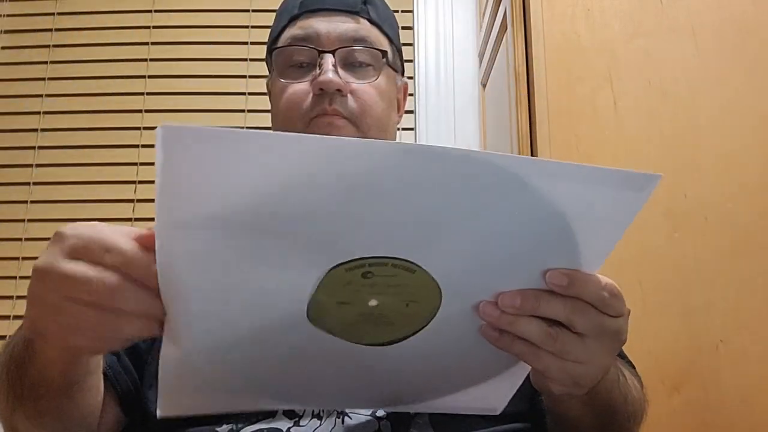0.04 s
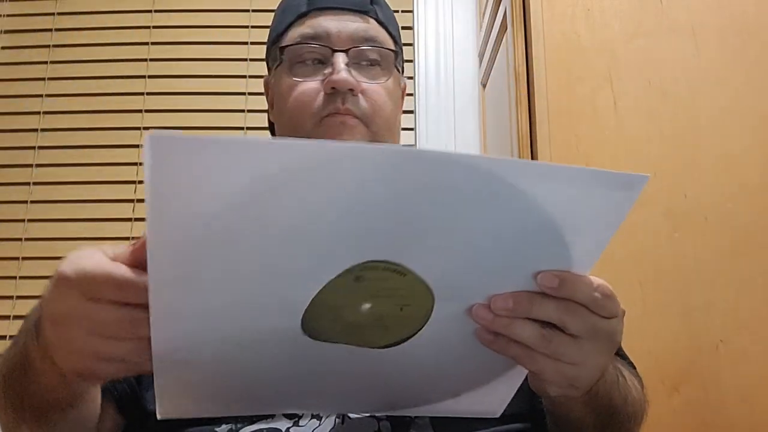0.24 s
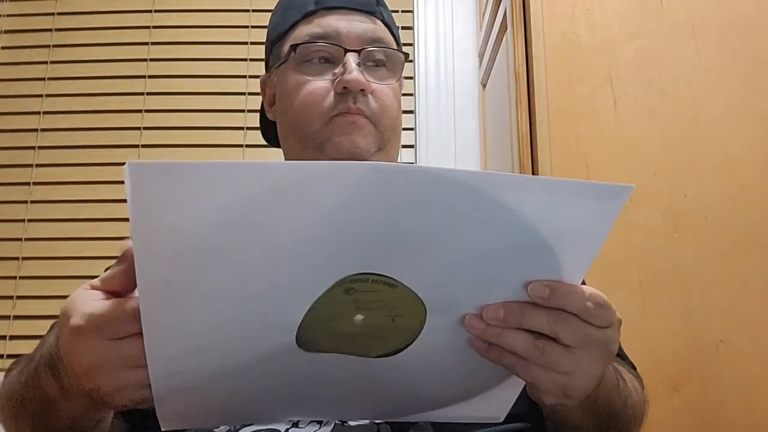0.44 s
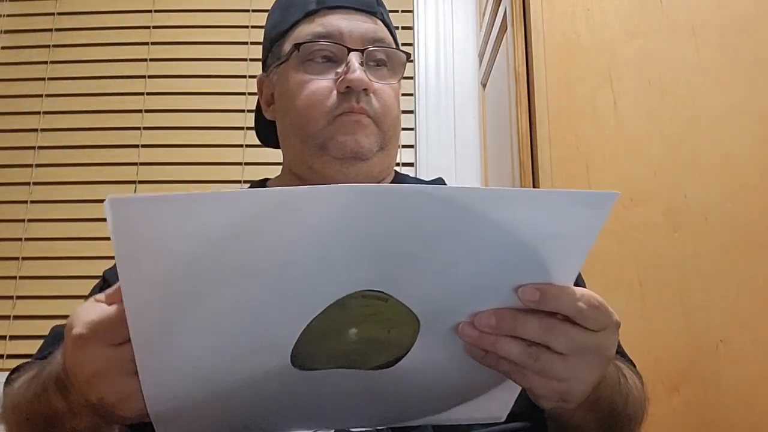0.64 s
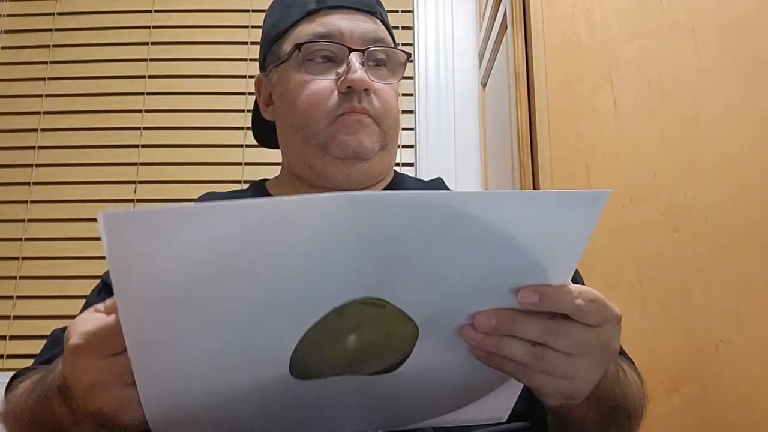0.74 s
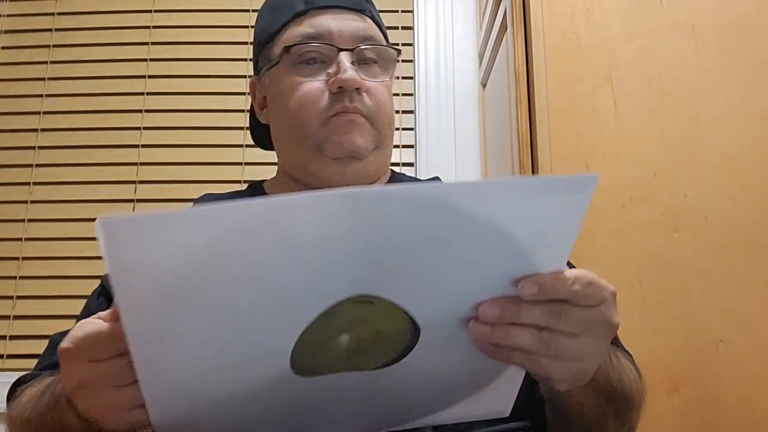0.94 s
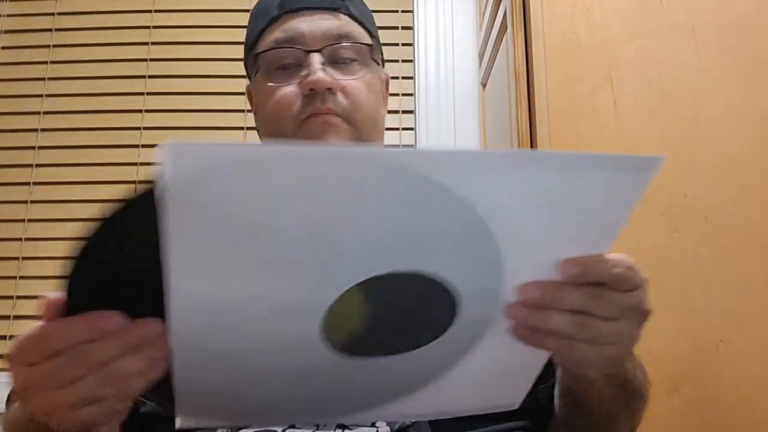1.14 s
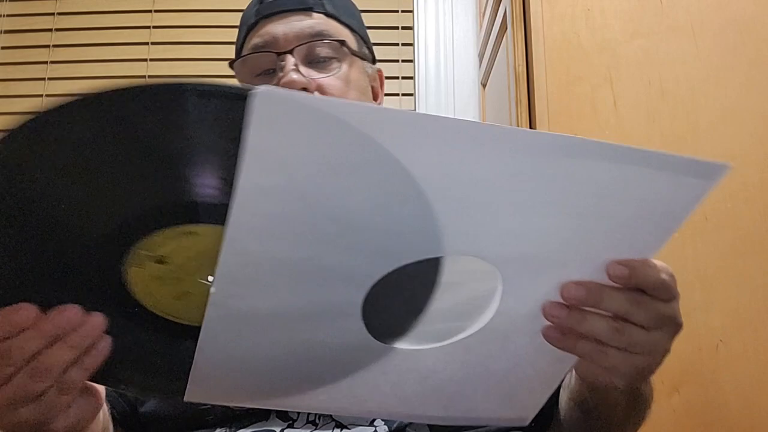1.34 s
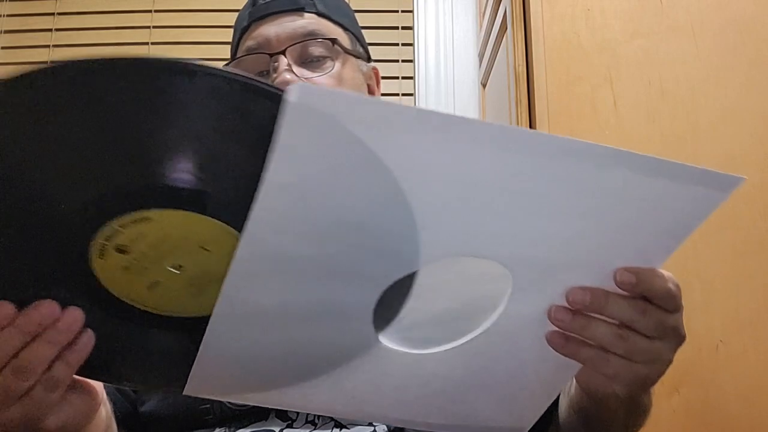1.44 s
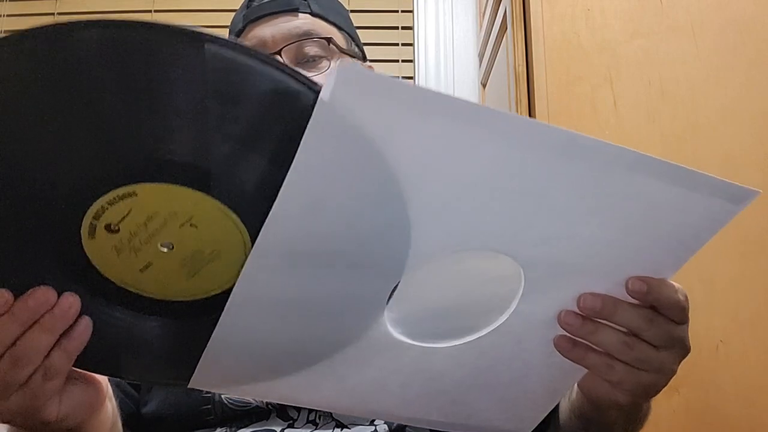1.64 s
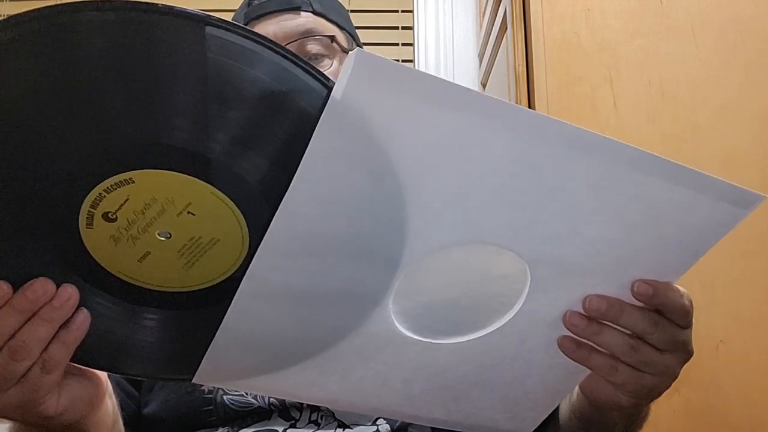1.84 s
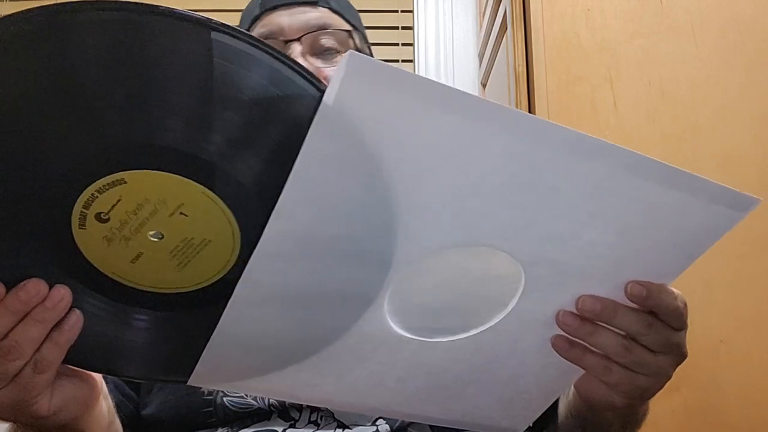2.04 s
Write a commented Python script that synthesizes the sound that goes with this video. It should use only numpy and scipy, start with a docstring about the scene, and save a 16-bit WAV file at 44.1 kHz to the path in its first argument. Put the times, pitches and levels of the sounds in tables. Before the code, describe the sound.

Paper crinkles and pops as a vinyl record is drawn hissing from its sleeve.

```python
"""A record leaves its paper sleeve

A small room with a low rumble; a vinyl record is handled close to a camera's stereo microphone.
Fingers rustle the inner sleeve open: creases tick, the paper buckles with one loud snap and flaps back.
The disc bumps free and slides out with a hiss that fades as less of it touches the paper."""
import sys
import numpy as np
from scipy import signal
from scipy.fft import rfft, irfft, next_fast_len
from scipy.io import wavfile
from scipy.ndimage import map_coordinates

SR = 44100
rng = np.random.default_rng(int(sys.argv[2]) if len(sys.argv) > 2 else 0)


def unload_wav(signal):
    """Save mono or channel-first audio to the path in sys.argv[1] as 16-bit WAV at rate SR, clipped to [-1, 1]."""
    wavfile.write(
        sys.argv[1],
        SR,
        np.round(np.clip(np.atleast_2d(signal).T, -1, 1) * 32767).astype(np.int16),
    )


N = 92610
TIME = np.arange(N) / SR
FFT_SIZE = 2 * next_fast_len(N * 5 // 8)
HZ = np.fft.rfftfreq(FFT_SIZE, 1 / SR)


def amp(db):
    """Decibels to gain."""
    return 10 ** (np.asarray(db) / 20)


def unit(x):
    """x at rms 1."""
    return x / np.sqrt(np.mean(x ** 2) + 1e-20)


def curve(points, hz=HZ):
    """(Hz, value) points read on a log frequency axis."""
    freqs, values = np.transpose(points)
    return np.interp(np.log(hz + 1), np.log(freqs + 1), values)


def envelopes(rows):
    """A gain per sample for each dB column, fading to silence outside the table."""
    times, *columns = np.transpose(rows)
    fade = np.interp(TIME, [times[0] - .03, times[0], times[-1], times[-1] + .03], [0, 1, 1, 0])
    return [fade * amp(np.interp(TIME, times, db)) for db in columns]


def swell(peak_s, sigma_s):
    """A bell-shaped envelope."""
    return np.exp(-.5 * ((TIME - peak_s) / sigma_s) ** 2)


def wobble(knots_per_s):
    """A smooth random curve."""
    return map_coordinates(rng.standard_normal(1024), [TIME * knots_per_s], mode="wrap")


def causal(colour):
    """The minimum-phase response of (Hz, dB) points."""
    cepstrum = irfft(curve(colour) * np.log(10) / 20)
    return np.exp(rfft(np.r_[cepstrum[0], 2 * cepstrum[1:FFT_SIZE // 2]], FFT_SIZE))


# How alike the microphone's two sides are. Each row: frequency in Hz, correlation.
MIC_LIKENESS = [(60, 0.49), (160, 0.95), (320, 0.97), (640, 0.76), (1400, 0.25), (2500, 0.45),
                (4000, -0.098), (6500, -0.1), (15000, 0)]
# The lean to the left. Each row: frequency in Hz, left minus right in dB.
MIC_BALANCE = [(60, 5.5), (130, 3.5), (300, 2), (1000, 1.5), (2500, 4.5), (6000, -.3), (15000, 0.1)]

def at_mic(pair, response):
    """Mid and side excitations through a response of unit power, spread over left and right."""
    angle = np.arccos(curve(MIC_LIKENESS)) / 2
    spectra = rfft(pair, FFT_SIZE) * response / np.sqrt(np.mean(abs(response) ** 2))
    mid, side = spectra * [np.cos(angle), np.sin(angle)]
    lean = amp(curve(MIC_BALANCE) / 2)
    return irfft(np.array([(mid + side) * lean, (mid - side) / lean]))[:, :N]


def noise(colour):
    """Smooth stereo noise at rms 1."""
    return unit(at_mic(rng.standard_normal((2, N)), amp(curve(colour))))


def friction(colour, grain_db, grains_per_s=1400, grain_share=.33):
    """Countless paper fibres slipping, some of them catching harder, at rms 1."""
    catches = rng.random(N) < grains_per_s / SR
    sizes = catches * amp(grain_db * np.minimum(rng.exponential(size=N), 2.3))
    grains = unit(signal.lfilter(np.hanning(12), 1, sizes) * rng.standard_normal((2, N)))
    slips = np.sqrt(grain_share) * grains + np.sqrt(1 - grain_share) * rng.standard_normal((2, N))
    return unit(at_mic(slips, causal(colour)))


def patchy(x, depth_db, patch_hz=202.8, patch_s=.025):
    """The bending sheet favours ever-changing narrow bands."""
    hz, t, spectra = signal.stft(x, SR, nperseg=512)
    where = np.meshgrid(hz / patch_hz, t / patch_s, indexing="ij")
    patches = map_coordinates(rng.standard_normal((256, 256)), where, mode="wrap")
    return unit(signal.istft(spectra * amp(depth_db * patches), SR, nperseg=512)[1][:, :N])


def burst(start, t60, attack_s=.0003, side_lag_s=.0003, click_share=.31):
    """A click, then a run of smaller slips that dies away, as mid and side excitations."""
    age = np.maximum(TIME - start, 0)
    decay = np.exp(-np.minimum(np.log(1000) * age / t60, 100))
    run = np.sign(rng.standard_normal((2, N))) * (1 - np.exp(-age / attack_s)) * decay
    click = np.sinc((TIME - start - attack_s - np.array([[0], [side_lag_s]])) * SR)
    return np.sqrt(1 - click_share) * run + np.sqrt(click_share) * np.linalg.norm(run[0]) * click


def centred(pair, side_db=-3):
    """Weakens the side excitation, so left and right sound more alike."""
    return pair * amp([[0], [side_db]])


# Room tone at the microphone. Each row: frequency in Hz, relative level in dB.
RUMBLE_COLOUR = [(25, -10), (45, -11.5), (67, 2), (100, -11.5), (170, -7.5), (300, -1), (450, -13),
                 (700, -20.5), (1200, -34.5), (2500, -40), (8000, -41.5), (16000, -44.5)]

def rumble():
    """The room's steady low background."""
    return amp(-58.5) * noise(RUMBLE_COLOUR)


# Fingers on the sleeve, close up. Each row: time in seconds, relative level in dB.
RUSTLE_LEVELS = [(0.0, -73.5), (0.052, -68), (0.06, -51.5), (0.114, -60), (0.154, -59.5), (0.16, -46),
                 (0.168, -34.5), (0.192, -42.5), (0.246, -46), (0.314, -63), (0.398, -51), (0.478, -53),
                 (0.522, -62.5), (0.592, -68.5), (0.614, -54.5), (0.766, -50.5), (0.82, -60.5),
                 (0.874, -49.5), (0.958, -62.5), (1.0, -61)]
# Their rub. Each row: frequency in Hz, relative level in dB.
RUSTLE_COLOUR = [(40, -26), (130, -8), (300, 1.5), (550, 0), (1200, -5.5), (1800, 1.5), (2400, -2),
                 (2900, -5), (3600, -4), (5000, -6), (8000, -6), (10000, -14.5), (13500, -13), (16000, -14)]

def rustle():
    """Fingers rub the paper as they work their way into the sleeve."""
    level, = envelopes(RUSTLE_LEVELS)
    return level * amp(5 + .8 * wobble(76)) * patchy(friction(RUSTLE_COLOUR, grain_db=1), depth_db=3)


# Creases popping near the microphone; the last row is the bright crack of the disc's knock at 1.15 s. # Each
# row: start in seconds, relative levels of ring and crack in dB, seconds to fall 60 dB.
CREASE_POPS = [(0.0624, -26.5, -30, 0.0047), (0.0732, -50, -33, 0.0071), (0.0798, -50, -28, .005),
               (.084, -36, -42, 0.0088), (0.12, -34.5, -60, 0.031), (0.1635, -18, -21.5, 0.035),
               (0.1661, -9.5, -22, 0.019), (.1692, -12.5, -27, 0.038), (.1762, -12, -31, .02),
               (.2285, -30.5, -34.5, 0.036), (0.336, -40.5, -54, 0.016), (0.3923, -30, -38, 0.019),
               (.409, -35.5, -48, 0.035), (0.419, -38.5, -47, 0.029), (0.442, -33, -51, 0.0093),
               (0.45, -33.5, -58, 0.0086), (0.4558, -44, -31, 0.0066), (0.4742, -39, -33, 0.0096),
               (.612, -39, -52, .04), (.643, -51, -43, .006), (.733, -42.5, -43.5, 0.039),
               (.769, -28, -50, .009), (.866, -41.5, -44, 0.022), (.875, -47, -33.5, .02),
               (1.1527, -26, -15, 0.0037)]
# The sleeve's resonances. Each row: frequency in Hz, width in Hz, relative level in dB.
SLEEVE_MODES = [(421, 47, -6), (693, 52.5, -8), (900, 60, -7), (1555, 310, -6.5), (1983, 160, -2.5),
                (2290, 140, -2), (2662, 60, -2), (3228, 280, -4.5), (4100, 1200, -16.5)]
# The bright crack. Each row: frequency in Hz, relative level in dB.
CRACK_COLOUR = [(100, -23), (1000, -3.5), (3000, 1), (5000, -3), (8000, 0), (10000, -10), (13500, -5.5),
                (16000, -4)]

def pops(low_cut_hz=253):
    """Each crease cracks and rings the sleeve, which radiates little bass."""
    modes = sum((-1) ** k * amp(db) * 1j * HZ * width / (pitch ** 2 - HZ ** 2 + 1j * HZ * width)
                for k, (pitch, width, db) in enumerate(SLEEVE_MODES))
    radiation = (1j * HZ / (low_cut_hz + 1j * HZ)) ** 2
    ring, crack = np.zeros((2, 2, N))
    for start, ring_db, crack_db, t60 in CREASE_POPS:
        slips = burst(start, t60)
        ring += amp(ring_db) * slips
        crack += amp(crack_db) * slips
    return at_mic(centred(ring), modes * radiation) + at_mic(crack, causal(CRACK_COLOUR) * radiation)


# Air from the sleeve, at close range. Each row: peak time in seconds, level in dB, sigma in seconds.
AIR_PUFFS = [(.09, -63, 0.014), (.182, -48, 0.016), (0.239, -40, .012), (0.287, -56, .01),
             (.4, -62.5, 0.017), (0.636, -58.5, 0.0061), (0.79, -60.5, 0.03), (1.11, -64, .02),
             (1.43, -57, .06), (1.963, -60, 0.052)]
# Its bass. Each row: frequency in Hz, relative level in dB.
PUFF_COLOUR = [(20, -13.5), (50, -5), (90, 3), (140, -9), (250, -23.5), (1000, -69)]

def puffs():
    """The flexing sheet gives low pushes of air with a wandering pitch."""
    wave = signal.hilbert(noise(PUFF_COLOUR))
    even_push = unit(wave.real / np.linalg.norm(wave, axis=0))
    return even_push * sum(amp(db) * swell(peak, sigma) for peak, db, sigma in AIR_PUFFS)


# Bumps inside the sleeve. Each row: start in seconds, relative level in dB, seconds to fall 60 dB,
# treble cutoff in Hz.
DISC_KNOCKS = [(.122, -43, .015, 1400), (.164, -26, 0.022, 800), (0.213, -32.5, .02, 2400),
               (.245, -37, .08, 1400), (0.269, -39, 0.065, 1200), (0.612, -46, 0.039, 1480),
               (.769, -35, 0.0088, 2000), (0.9434, -37, .022, 950), (1.063, -33, 0.033, 496),
               (1.1054, -26.5, 0.011, 1600), (1.1517, -14, 0.0078, 4400), (1.295, -40.5, 0.031, 590),
               (1.446, -44, 0.028, 505), (1.592, -48, .12, 330)]
# Their body. Each row: frequency in Hz, relative level in dB.
KNOCK_COLOUR = [(40, -32), (150, -8.5), (280, -0.5), (450, 5.5), (700, -2.5), (1000, 2), (1250, -7),
                (1700, 1.5), (4000, -8.5), (16000, -9.5)]

def knocks():
    """Disc and sheet bump together: the softer the contact, the less treble."""
    body = causal(KNOCK_COLOUR)
    bumps = np.zeros((2, N))
    for start, db, t60, cutoff in DISC_KNOCKS:
        lowpass = 1 / (1 + np.sqrt(2) * 1j * HZ / cutoff - (HZ / cutoff) ** 2)
        bumps += amp(db) * at_mic(centred(burst(start, t60)), body * lowpass)
    return bumps


# A loose, dull crumple. Each row: frequency in Hz, relative level in dB.
FLAP_COLOUR = [(60, -20), (200, -4), (420, 2), (800, -3), (1000, -1), (1300, -6), (1600, 1), (2400, -2.5),
               (2900, -14.5), (5000, -20), (16000, -36)]

def flap():
    """After the snap the buckled sheet flutters back against the disc."""
    level = amp(-33.5 + 1.1 * wobble(200)) * swell(peak_s=.226, sigma_s=.018)
    return level * friction(FLAP_COLOUR, grain_db=3.5)


# The disc drawn out close to the microphone. Each row: time in seconds, then relative levels of hiss,
# midrange and low rub in dB.
SLIDE_LEVELS = [(.97, -71, -63, -58), (1.025, -49, -49, -55.5), (1.07, -40.5, -40.5, -44),
                (1.12, -37.5, -44, -51), (1.185, -36, -41, -45.5), (1.22, -43, -47, -49),
                (1.265, -42.5, -43.5, -48), (1.335, -39, -46.5, -51), (1.37, -47, -51, -54),
                (1.46, -49.5, -56, -56), (1.57, -56.5, -57.5, -60), (1.63, -62.5, -67.5, -64),
                (1.7, -72, -73.5, -73), (1.95, -93, -89, -79.5)]
# The layers of that slide. Each row: frequency in Hz, relative level in dB.
EARLY_HISS_COLOUR = [(1500, -25), (3000, -5.5), (4500, -0.5), (6500, 1), (7300, 0), (8000, 4), (8800, -3.5),
                     (11000, -9), (13500, -6.5), (16000, -8)]
LATE_HISS_COLOUR = [(1500, -23.5), (3000, -12), (4500, -6), (6500, -2.5), (7300, -2.5), (8000, 1.5),
                    (8800, -3), (11000, -6), (13500, -2.5), (16000, -5.5)]
MIDRANGE_COLOUR = [(500, -24), (950, -3), (1250, -8.5), (1750, -2.5), (2300, -1.5), (2800, -6.5),
                   (3450, -2), (4300, -4.5), (7000, -26)]
LOW_RUB_COLOUR = [(60, -21.5), (160, -10), (270, 0.5), (520, 0.5), (720, -5.5), (1100, -16.5),
                  (2500, -44.5)]

def slide(thinning_s=(1.154, 1.36)):
    """Vinyl drags over paper: a hiss that thins as the sleeve empties, midrange and an uneven low rub."""
    hiss_gain, mid_gain, low_gain = envelopes(SLIDE_LEVELS)
    drag_db = .35 * wobble(45.65)
    emptied = np.interp(TIME, thinning_s, [0, 1])
    early = np.sqrt(1 - emptied) * friction(EARLY_HISS_COLOUR, grain_db=1)
    late = np.sqrt(emptied) * friction(LATE_HISS_COLOUR, grain_db=.5)
    hiss = hiss_gain * amp(2.5 + drag_db) * patchy(early + late, depth_db=3.2)
    midrange = mid_gain * amp(1 + drag_db) * patchy(friction(MIDRANGE_COLOUR, grain_db=1.5), depth_db=3)
    low_rub = low_gain * amp(-.5 + 1.3 * wobble(35)) * friction(LOW_RUB_COLOUR, grain_db=3.5)
    return hiss + midrange + low_rub


# Brief whistles. Each row: peak time in seconds, pitch in Hz, level in dB, sigma in seconds.
RIM_SQUEAKS = [(1.325, 9700, -41.5, 0.0066), (1.42, 3080, -45.5, 0.01), (1.477, 4400, -46, 0.0038)]

def squeaks(width_per_pitch=.035):
    """The disc's rim sticks and slips on the paper in narrow bands of noise."""
    whistles = np.zeros((2, N))
    for peak, pitch, db, sigma in RIM_SQUEAKS:
        band = 1 / (1 + ((HZ - pitch) / (width_per_pitch * pitch)) ** 2)
        whistles += amp(db) * swell(peak, sigma) * at_mic(rng.standard_normal((2, N)), band)
    return whistles


# Paper on vinyl, faint even this close. Each row: frequency in Hz, relative level in dB.
BRUSH_COLOUR = [(900, -17), (1400, -9.5), (1850, 4.5), (2800, -13.5), (3900, -1), (5000, -8), (6500, 0.5),
                (8800, -1), (10500, -12), (16000, -14)]

def brush():
    """The emptied sleeve grazes the disc once more."""
    return amp(-74) * swell(peak_s=1.833, sigma_s=.082) * friction(BRUSH_COLOUR, grain_db=4)


# The small room around the microphone. Each row: frequency in Hz, seconds to fall 60 dB.
ROOM_DECAY = [(100, 1), (500, 0.48), (2500, 0.28), (8000, .32), (15000, 0.46)]

def room(x, build_up_s=.0024):
    """Reflections build into a tail, each frequency dying at its own speed."""
    hz, t, spectra = signal.stft(rng.standard_normal((2, SR // 2)), SR, nperseg=256)
    decay = np.exp(-np.log(1000) * t / curve(ROOM_DECAY, hz)[:, None])
    tail = signal.istft(spectra * decay, SR, nperseg=256)[1]
    tail *= 1 - np.exp(-(TIME[:tail.shape[1]] / build_up_s) ** 2)
    wet = signal.fftconvolve(x, tail / np.linalg.norm(tail[0]), axes=1)[:, :N]
    return at_mic(wet, np.ones(len(HZ)))


def scene():
    """Sleeve and disc up close, the room's tail and rumble behind them."""
    paper = pops() + flap() + knocks() + rustle() + slide() + squeaks() + brush()
    return paper + amp(-12) * room(paper) + puffs() + rumble()


def record(dry, top_hz=15650, edge_hz=300):
    """The camera keeps nothing above its band limit."""
    passband = np.clip((top_hz - HZ) / edge_hz + .5, 0, 1)
    return irfft(rfft(dry, FFT_SIZE) * passband)[:, :N]


dry = scene()
out = record(dry)
unload_wav(out)
```